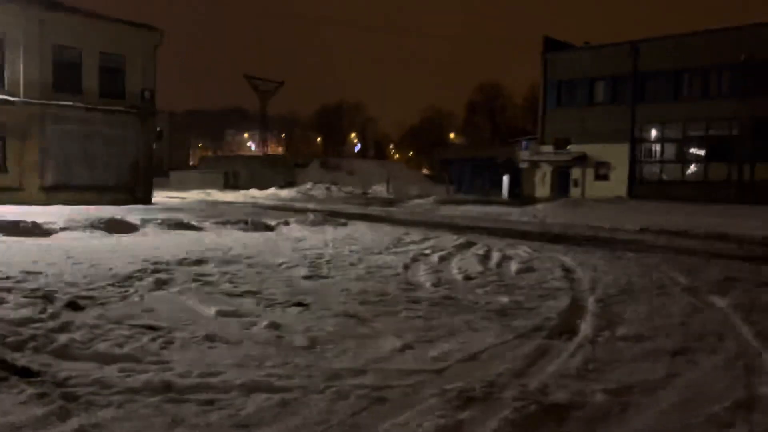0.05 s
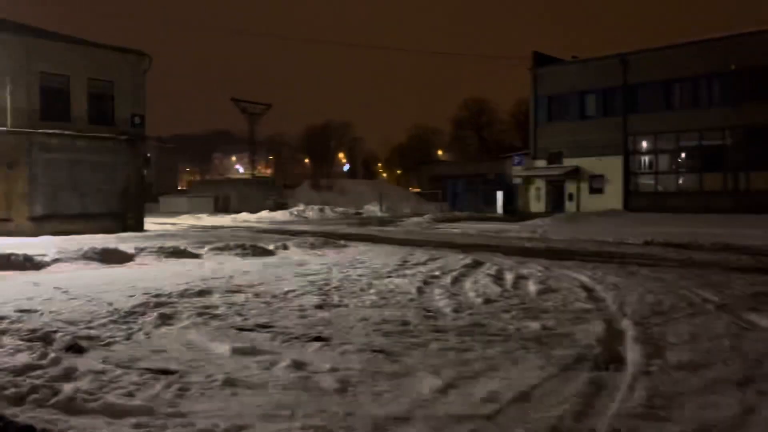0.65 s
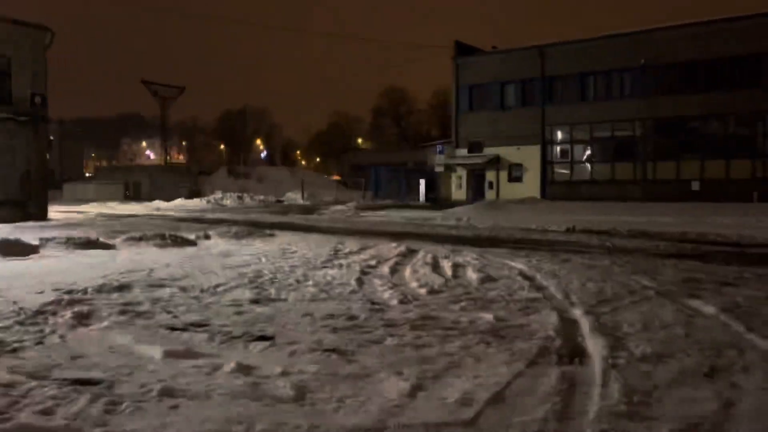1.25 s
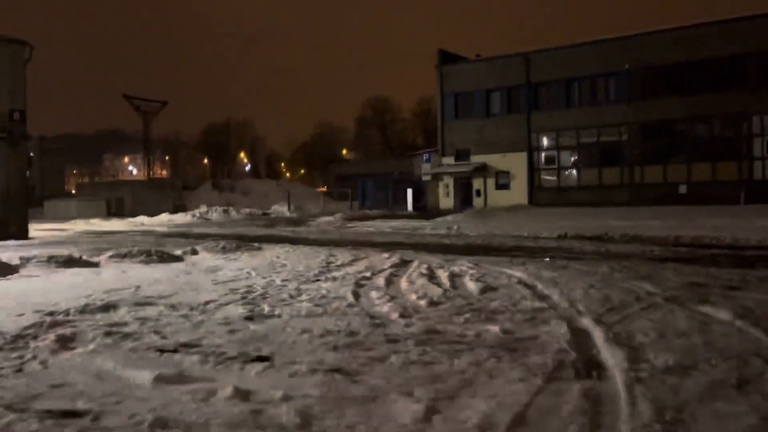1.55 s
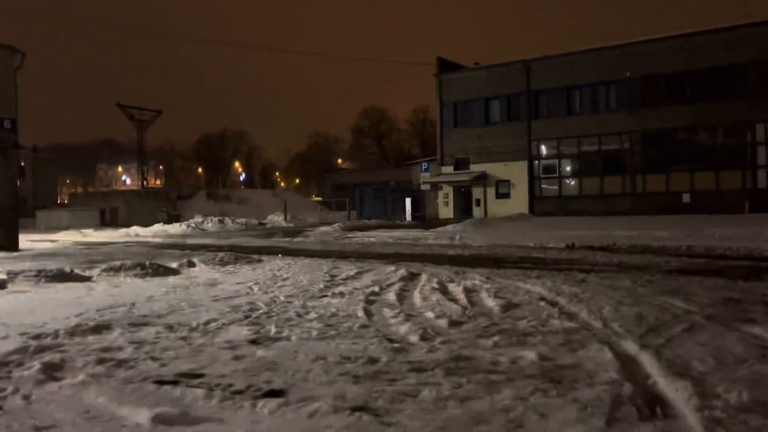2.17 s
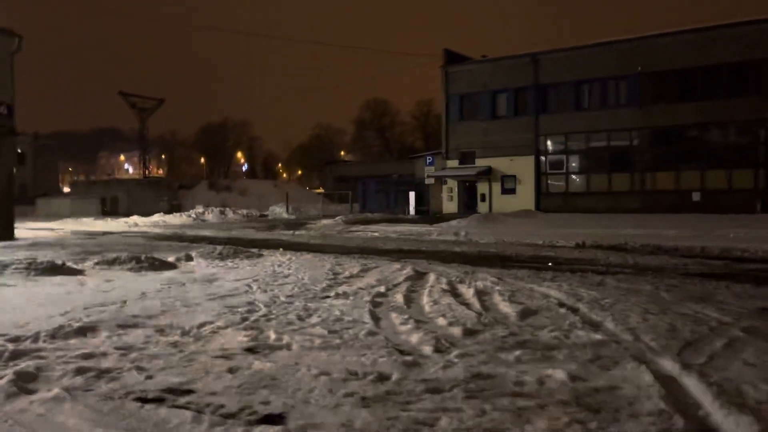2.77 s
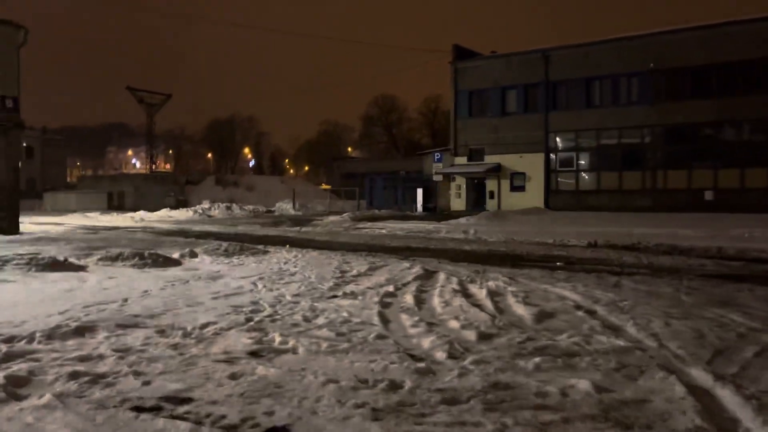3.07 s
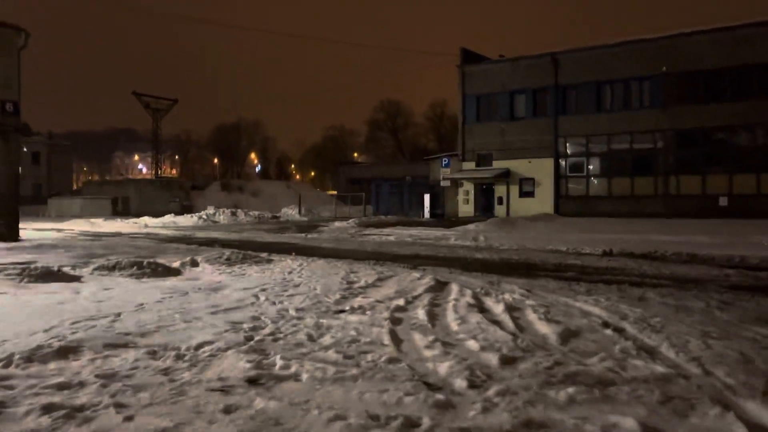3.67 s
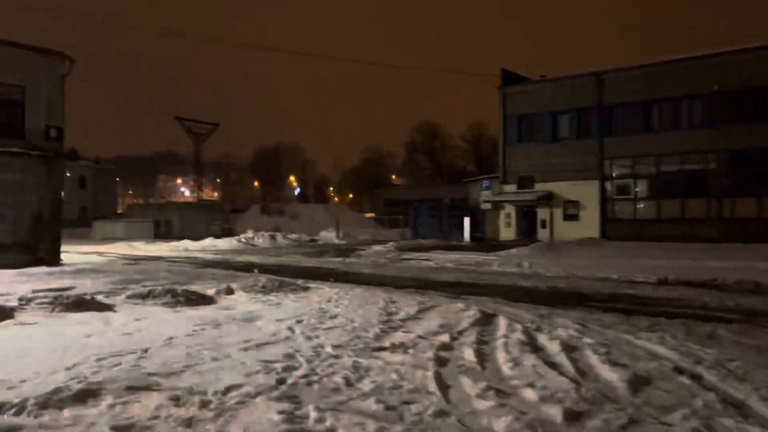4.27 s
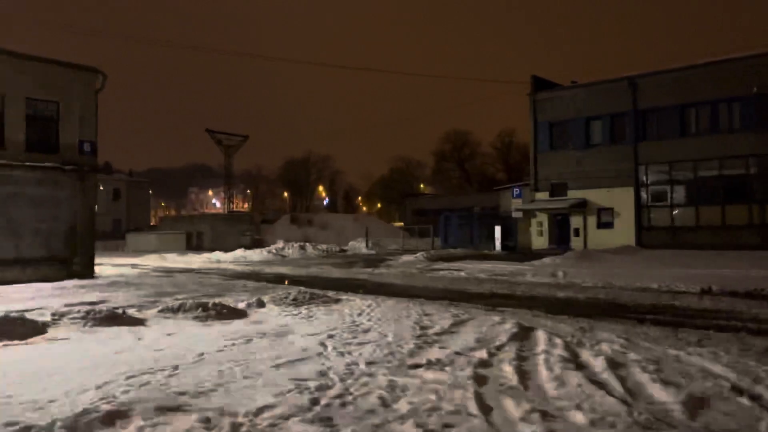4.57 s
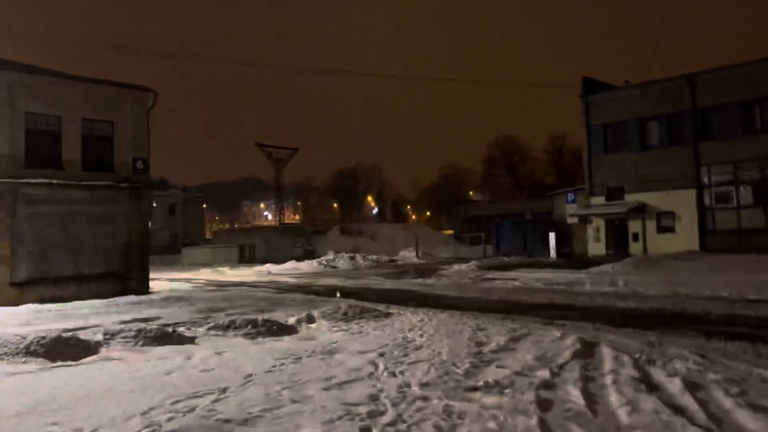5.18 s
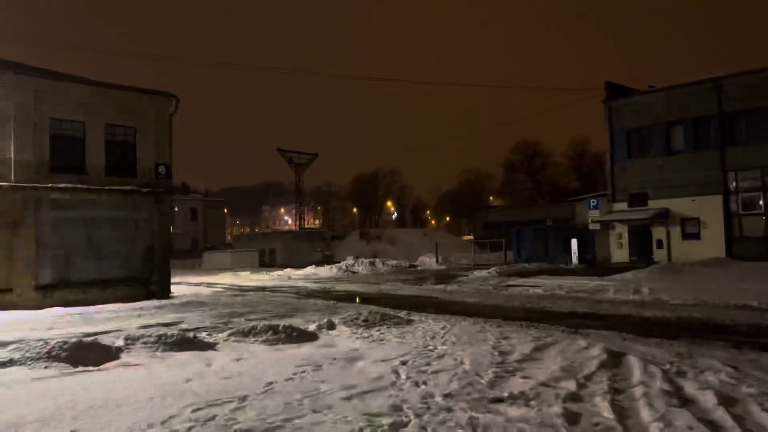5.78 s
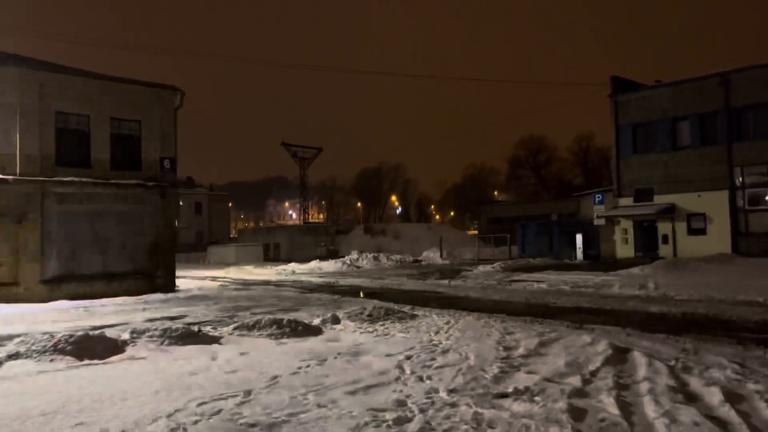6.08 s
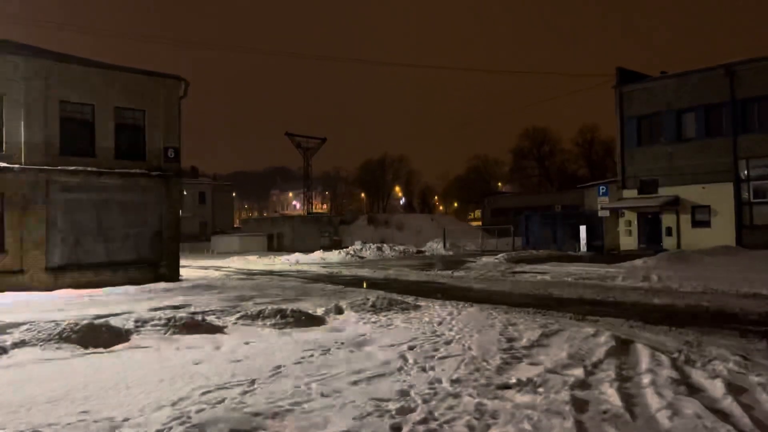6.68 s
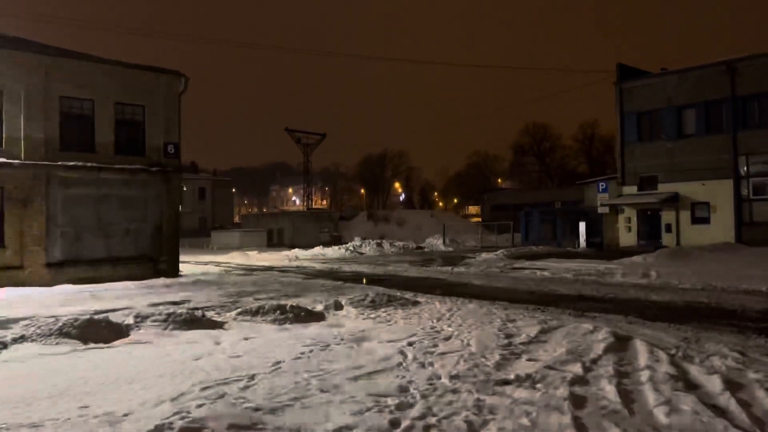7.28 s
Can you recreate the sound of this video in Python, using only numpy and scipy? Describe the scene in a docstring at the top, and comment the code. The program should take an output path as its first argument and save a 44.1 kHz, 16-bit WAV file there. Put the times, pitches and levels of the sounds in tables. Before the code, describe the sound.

Outdoors, someone walks at an even pace over frozen snow, each close step a gritty crunch with small snaps, scuffs and soft thumps. Short, low puffs of wind hit the handheld microphone early on, and clothing swishes lightly. The steps end after about five and a half seconds. What remains is quiet: a low town rumble, far traffic and a faint engine rising in pitch.

```python
"""An empty yard at night, on trodden, icy snow, heard from a phone in the hand of a walker who stops
after five and a half seconds. Close below, each sole crushes and scrapes the crust: collapsing grains
ring dully in the packed snow and fizz in the treble, with thuds, cracks and ticking crumbs of ice.
A jacket rustles beside the microphone and air buffets it now and then. Far off, traffic murmurs
and one engine slowly gathers speed."""
import sys
import numpy as np
from scipy import signal
from scipy.fft import rfft, irfft
from scipy.io import wavfile
from scipy.ndimage import uniform_filter1d

SR = 44100
rng = np.random.default_rng(int(sys.argv[2]) if len(sys.argv) > 2 else 0)


def dump_mix(stems):
    """Bounce the given channels to the path in sys.argv[1] as a 16-bit WAV at rate SR."""
    frames = np.atleast_2d(stems).T  # one column per channel
    limited = np.clip(frames, -1, 1)  # hard clip at full scale
    pcm = np.round(limited * 32767).astype(np.int16)
    wavfile.write(sys.argv[1], SR, pcm)


N = 332514
TIME = np.arange(N) / SR


def undb(db):
    """Decibels to gain."""
    return 10 ** (np.asarray(db) / 20)


def unit(x):
    """Scale to rms 1."""
    return x / np.sqrt(np.mean(x ** 2) + 1e-18)


def add(track, start_s, sound):
    """Mix a sound into a track."""
    i = max(int(start_s * SR), 0)
    track[i:i + len(sound)] += sound[:max(N - i, 0)]


def colour(x, spectrum, size=4096):
    """Causal filter shaped by (frequency_hz, relative_db) points; keeps the power of white noise."""
    hz, db = np.transpose(spectrum)
    gain = undb(np.interp(np.log(np.fft.rfftfreq(size, 1 / SR) + 1), np.log(hz), db))
    cepstrum = irfft(np.log(gain))
    cepstrum[1:size // 2] *= 2  # folding the cepstrum gives minimum phase
    cepstrum[size // 2 + 1:] = 0
    response = irfft(np.exp(rfft(cepstrum)))
    return signal.oaconvolve(x, response / np.linalg.norm(response))[:N]


def noise(spectrum):
    """Coloured noise, rms near 1."""
    return colour(rng.standard_normal(N), spectrum)


def drift(rate_hz):
    """Smooth random drift, spread near 1."""
    return np.interp(TIME * rate_hz, np.arange(N), rng.standard_normal(N))


# Far traffic, its murmur and its tyre hiss: frequency_hz, relative_db
MURMUR_SPECTRUM = [(60, 6.5), (120, 6.5), (250, -1.5), (400, 0), (1000, 0), (1500, -3.5), (2200, -12),
                   (4800, -30.5), (9000, -42), (10800, -74)]
TYRE_SPECTRUM = [(1200, 1.5), (2200, -2), (3300, 4), (4700, -5.5), (5800, -22), (10000, -40)]


def far_traffic(murmur_rise_db_per_s=0.6052, car_nears_s=4.9, hiss_rise_db_per_s=4.5):
    """A wide murmur of tyres grows slowly; their hiss rises faster once a car draws nearer."""
    murmur_db = -53 + murmur_rise_db_per_s * TIME
    hiss_db = -72.5 + hiss_rise_db_per_s * np.maximum(TIME - car_nears_s, 0)
    mid, side = (undb(murmur_db + 1.5 * drift(2.5)) * noise(MURMUR_SPECTRUM)
                 + undb(hiss_db) * noise(TYRE_SPECTRUM) for _ in range(2))
    return 0.86 * mid + np.array([[.45], [-.45]]) * side


# One engine across town, pitched at its firing rate: time_s, pitch_hz, level_db
ENGINE_REVS = [(0, 55.26, -52), (5.2, 59.8, -57), (5.601, 64.6, -56), (5.949, 72.06, -47),
               (6.301, 78.1, -46), (6.702, 79.8, -48.5), (7.051, 87.7, -53), (7.301, 94.7, -47.5),
               (7.54, 103, -45)]


def far_engine():
    """A lumpy engine pulls up through its revs; the way across town fades each order in and out."""
    times, *columns = np.transpose(ENGINE_REVS)
    firing_hz, level_db = (np.interp(TIME, times, column) for column in columns)
    phase = 2 * np.pi * np.cumsum(firing_hz) / SR
    engine = np.zeros(N)
    for order, order_db in [(1, 0), (3 / 4, -6), (3, -17)]:
        fading = .8 + drift(14) + 1j * drift(14)
        engine += undb(order_db) * np.real(fading * np.exp(1j * order * phase))
    return unit(engine) * undb(level_db)


# Rumble of the town beyond the yard: frequency_hz, relative_db
RUMBLE_SPECTRUM = [(20, -19), (36, -7.5), (52, 19), (70, 12), (110, -0.5), (250, -66)]
# Its rise and fall: time_s, level_db
RUMBLE_SWELLS = [(0, -53), (2.7, -47.5), (4.1, -60), (5.7, -45.5), (7.54, -56)]


def town_rumble():
    """The town's low rumble slowly swells and sinks."""
    level_db = np.interp(TIME, *np.transpose(RUMBLE_SWELLS))
    return undb(level_db) * noise(RUMBLE_SPECTRUM)


# Air striking the microphone: start_s, length_s, level_db
GUSTS = [(0, .16, -34.5), (0.428, 0.075, -36.5), (.588, 0.047, -38), (.948, 0.2, -27.5),
         (1.027, 0.063, -28.5), (1.169, 0.045, -19), (1.23, .2, -33.5), (1.658, 0.034, -39),
         (1.907, 0.27, -42), (2.293, 0.079, -33.5), (2.468, 0.08, -31.5), (2.692, 0.056, -39.5),
         (3.406, 0.03, -34), (3.644, 0.072, -39)]
# Its eddies, right at the ports: frequency_hz, relative_db
EDDY_SPECTRUM = [(22, -47), (45, -3.5), (68, 0), (110, -5.5), (200, -24.5), (400, -35), (900, -94)]


def wind_buffets(edge_s=0.034):
    """Eddies thump on the two microphone ports, partly on each alone."""
    force = np.zeros(N)
    for start, length, db in GUSTS:
        onset = np.tanh((TIME - start) * 2 / edge_s)
        ending = np.tanh((TIME - start - length) * 2 / edge_s)
        force += undb(db) * (onset - ending) / 2
    shared = noise(EDDY_SPECTRUM)
    eddies = np.array([shared + noise(EDDY_SPECTRUM) / 2 for _ in range(2)])
    running_rms = np.sqrt(uniform_filter1d(np.mean(eddies ** 2, axis=0), SR // 20))
    return force * eddies / running_rms


# A sleeve slides on the jacket, within arm's length: middle_s, half_width_s, level_db
SLEEVE_SWISHES = [(.035, 0.034, -51), (3.4, 0.22, -61), (5.76, .07, -54), (6.74, 0.21, -80)]
# The sliding cloth: frequency_hz, relative_db
SLEEVE_SPECTRUM = [(2500, -26), (4400, -12), (5300, 3), (6600, -4), (7400, 0), (8600, 4.5), (10200, 9),
                   (11500, -11), (12600, -20)]


def jacket(rustle_db=-63.5, rest_s=5.79, fade_db_per_s=42):
    """A jacket rustles faintly, bright as the ice, until the walker rests; at times a sleeve swishes."""
    moving_db = rustle_db - fade_db_per_s * np.maximum(TIME - rest_s, 0)
    rustle = undb(moving_db + 2.2 * drift(17)) * noise(ICE_SPECTRUM)
    sliding = sum(undb(db) * np.exp(-((TIME - middle) / width) ** 2)
                  for middle, width, db in SLEEVE_SWISHES)
    swish = sliding * noise(SLEEVE_SPECTRUM)
    return (rustle + swish) * undb(3.2 * drift(350))


def after_steps(db, spread_db, within_s=0.38, count=4):
    """A few small events at random moments after each heel strike: start_s, level_db."""
    heels = np.repeat([step[0] for step in FOOTFALLS], count)
    when, size = rng.random((len(heels), 2)).T
    return list(zip(heels + within_s * np.sqrt(when), db + spread_db * (2 * size - 1)))


# Kicked ice crumbs landing near the feet: start_s, relative_db
KICKED_CRUMBS = [(0.027, -23.5), (.1321, -31), (0.174, -30), (2.956, -39), (3.3636, -22), (3.4425, -28),
                 (3.493, -25), (3.9678, -33), (5.0584, -30), (5.664, -34.5), (5.893, -38.5),
                 (6.4668, -34.5)]


def ice_crumbs(ring_s=0.00092):
    """Bits of ice tick brightly on the frozen ground; every step also scatters finer ones."""
    ticks = np.zeros(N)
    t = np.arange(SR // 100) / SR
    for start, db in KICKED_CRUMBS + after_steps(db=-42.5, spread_db=-4):
        add(ticks, start, undb(db) * np.exp(-t / ring_s) * rng.standard_normal(len(t)))
    tick_spectrum = [(1500, -21), (5000, 0), (7000, -7.5), (8500, 8.5), (10500, 5), (12500, -9)]
    return undb(-5.5) * colour(ticks, tick_spectrum)


# Footfalls below the microphone; fizz (ice) and shake (ground) are relative to the crunch:
# start_s, bite_db, heel_s, heel_db, heel_swell_db, roll_db, sole_lag_s, sole_s, sole_db,
# settle_db, fizz_db, shake_db, grains_per_s
FOOTFALLS = [(.225, -50, 0.05, -31.5, -4.5, -48, .12, 0.044, -45, -53.5, -4, -8.5, 13400),
             (.762, -37.5, 0.078, -37, -1.5, -38.5, 0.16, 0.03, -30.5, -82, -3.5, -2.5, 3860),
             (1.291, -45, 0.053, -31.5, -8, -40.5, 0.13, 0.033, -27.5, -43.5, -2.5, -4.5, 5000),
             (1.92, -32.5, 0.053, -42, 10, -57, 0.065, 0.049, -36, -44.5, -5, -2.5, 1200),
             (2.474, -35.5, 0.021, -40.5, -5.5, -38, 0.038, 0.05, -33.5, -40, -6, -4, 1280),
             (3.021, -51, 0.14, -36.5, 9, -38, 0.18, 0.024, -32, -51, -3, -1.5, 9300),
             (3.64, -41, .043, -34, 1, -42, .136, .026, -31, -47.5, -5, -2.5, 1500),
             (4.235, -59, .13, -37, 4.5, -47, .189, 0.045, -38.5, -50, 0, -4, 8400),
             (4.78, -51, 0.08, -41, 13, -44.5, 0.14, 0.032, -36.5, -49.5, -3.5, -1.5, 4100),
             (5.375, -39, 0.014, -35, -8, -51, 0.049, 0.066, -34, -51.5, -8, -2, 3460)]
# A boot slips, pushes off or grazes the crust in mid swing: start_s, length_s, level_db, fizz_db
BOOT_SCUFFS = [(0.07, 0.023, -41, -3), (1.255, 0.025, -39, -14), (1.545, 0.0098, -27.5, -8.5),
               (1.793, 0.014, -36.5, -6), (1.826, 0.011, -41.5, -13), (3.122, 0.0283, -35.5, -13),
               (3.349, 0.029, -45.5, -13), (3.389, 0.006, -27.5, -15), (3.835, 0.0548, -40, -6.5),
               (4.092, .016, -37.5, -4.5), (4.135, 0.0071, -33.5, -4), (4.213, 0.0044, -30.5, -9.5),
               (4.70, 0.028, -41.5, -7), (5.054, 0.045, -42, -6), (5.523, .014, -39, -7)]


def boot_strokes(bite_s=0.003, bite_swell_db=-16, bite_grains_per_s=3000, settle_s=0.13):
    """The heel bites and digs in, the foot rolls, the sole lands, the snow settles; scuffs come too."""
    for (heel_at, bite_db, heel_s, heel_db, swell_db, roll_db, lag_s, sole_s, sole_db,
         settle_db, fizz_db, shake_db, rate) in FOOTFALLS:
        sole_at = heel_at + lag_s
        roll_s = max(lag_s - heel_s, .005)
        bright_db, muffled_db = fizz_db + 0.76, fizz_db - 2.5  # the heel scrapes, the flat sole muffles
        # start_s, length_s, level_db, fizz_db, shake_db, swell_db, grains_per_s
        yield heel_at, bite_s, bite_db, bright_db, shake_db, bite_swell_db, bite_grains_per_s
        yield heel_at, heel_s, heel_db, bright_db, shake_db - 0.5, swell_db, rate
        yield heel_at + heel_s, roll_s, roll_db, muffled_db, shake_db, -4, rate * 0.65
        yield sole_at, bite_s, sole_db - 7, muffled_db, shake_db, bite_swell_db, bite_grains_per_s
        yield sole_at, sole_s, sole_db, muffled_db, shake_db, 1.5, rate
        yield sole_at + sole_s, settle_s, settle_db, muffled_db, shake_db, -12, rate * .4
    for start, length, db, fizz_db in BOOT_SCUFFS:
        yield start, length, db, fizz_db, 0.5, 0, 1700


def sole_pressure(length_s, swell_db, grains_per_s, attack_s=0.0026, release_s=0.0035, slip_s=0.0059):
    """Pressure over one stroke: coarse crust gives way in jerks, fine snow slides evenly."""
    t = np.arange(int((length_s + 5 * release_s) * SR)) / SR
    pressure = undb(swell_db * np.minimum(t / length_s, 1)) * (1 - np.exp(-t / attack_s))
    pressure *= np.exp(-np.maximum(t - length_s, 0) / release_s)
    # every 7 to 20 ms the crust yields at once, then holds again
    slips = np.cumsum(np.append(0, rng.uniform(.007, .02, 50)))
    since_slip = t - slips[np.searchsorted(slips, t, side="right") - 1]
    jerk_db = 14 / np.sqrt(1 + (grains_per_s / 4000) ** 2)
    return pressure * undb(jerk_db * np.exp(-since_slip / slip_s))


def grains(pressure, length_s, grains_per_s, spread_db=3.5):
    """Unevenly sized grains collapse at random under the pressure; rms 1 over the stroke's length."""
    grain_rng = np.random.default_rng(rng.integers(2 ** 31))
    luck, size, sign = grain_rng.random((len(pressure), 3)).T
    breaks = luck <= max(grains_per_s / SR, np.sort(luck)[4])  # at least five grains
    size_db = spread_db * np.minimum(-np.log(1 - size), 3.5)
    impulses = breaks * undb(size_db) * np.sign(sign - .5) * pressure
    return unit(impulses) * np.sqrt(length_s * SR / len(pressure))


def shatter(impulses, decay_s):
    """Each impulse becomes a tiny burst of noise."""
    pole = np.exp(-1 / (decay_s * SR))
    power = signal.lfilter([1 - pole], [1, -pole], impulses ** 2 + 1e-18)
    return np.sqrt(power) * rng.standard_normal(N)


def crystal_patches(x, split_hz, spread_db, rate_hz, low_db=0):
    """Coarse and fine crystals take turns: the low and high bands flicker separately."""
    low = signal.sosfiltfilt(signal.butter(2, split_hz, fs=SR, output="sos"), x)
    low_flicker, high_flicker = (unit(undb(spread_db * drift(rate_hz))) for _ in range(2))
    return low * undb(low_db) * low_flicker + (x - low) * high_flicker


# Shaken ground, packed snow and icy surface, from hand height: frequency_hz, relative_db
GROUND_SPECTRUM = [(50, -16.5), (110, -5.5), (180, -2.5), (280, -3), (450, -25), (900, -50.5)]
SNOW_SPECTRUM = [(100, -30.5), (300, -3), (550, 0), (900, -1.5), (1400, -4), (1900, -11.5), (2600, -26.5),
                 (5000, -53)]
ICE_SPECTRUM = [(900, -3.5), (1800, -1.5), (2800, -1), (3800, -2.5), (5500, -7.5), (6300, -4.5),
                (7100, -9.5), (8100, -1.5), (9500, -4), (10400, 0), (11500, -7), (12400, -17.5),
                (13200, -20)]


def snow_crunch(fizz_steadiness=0.25, medium_grains_per_s=2260, crackle_db_per_octave=2.0):
    """Collapsing grains shake the ground, ring the packed snow and fizz at the icy surface."""
    ground, snow, ice = np.zeros((3, N))
    for start, length, db, fizz_db, shake_db, swell_db, rate in boot_strokes():
        pressure = sole_pressure(length, swell_db, rate)
        surface, deep = (grains(pressure, length, rate) for _ in range(2))
        add(ground, start, deep * undb(db + shake_db))
        add(snow, start, (surface + deep) / np.sqrt(2) * undb(db))
        progress = np.minimum(np.arange(len(pressure)) / (length * SR), 1)
        steadying_db = fizz_steadiness * swell_db * (1 - progress)  # fizz follows only part of the swell
        add(ice, start, surface * undb(db + fizz_db + steadying_db))
    # loosened powder keeps trickling for a moment after each collapse
    fizz = undb(1) * shatter(ice, decay_s=0.00097) + undb(-13) * shatter(ice, decay_s=0.012)
    settling = undb(-14.5) * shatter(snow, decay_s=0.0062)
    fizz = colour(fizz, ICE_SPECTRUM)
    ring = colour(undb(1.57) * snow + settling, SNOW_SPECTRUM)
    # coarse crust, with fewer grains a second, crackles lower than fine snow
    heels, *_, rates = np.transpose(FOOTFALLS)
    crackle_db = crackle_db_per_octave * np.interp(TIME, heels, np.log2(medium_grains_per_s / rates))
    fizz = crystal_patches(fizz, split_hz=4200, spread_db=0.37, rate_hz=99, low_db=crackle_db)
    ring = crystal_patches(ring, split_hz=1360, spread_db=2.9, rate_hz=90)
    return colour(ground, GROUND_SPECTRUM) + ring + fizz


# Dull blows of the heels and of the jolted phone: start_s, level_db, pitch_hz
SOFT_BLOWS = [(0.083, -28.5, 294), (.767, -22, 184), (.933, -20, 260), (1.033, -21.5, 161),
              (1.089, -19, 197), (1.183, -25, 178), (1.945, -25.5, 220), (2.501, -18, 176),
              (3.394, -21, 215), (3.67, -19.5, 157), (5.487, -30.5, 210), (6.469, -41, 300.2)]


def thuds(rise_s=.0032, sag_s=.005):
    """A soft blow gives a few low swings that sag through their listed pitch as the contact widens."""
    track = np.zeros(N)
    t = np.arange(SR // 20) / SR
    envelope = t / rise_s * np.exp(1 - t / rise_s)
    sag = .7 + .9 * np.exp(-t / sag_s)
    for start, db, hz in SOFT_BLOWS:
        phase = 2 * np.pi * np.cumsum(hz * sag) / SR
        add(track, start, undb(db) * envelope * np.sin(phase))
    return track


# Pieces of crust snapping underfoot: start_s, level_db, pitch_hz
CRUST_PIECES = [(0.485, -32, 1500), (0.5602, -29.5, 1360), (0.634, -35, 1500), (0.704, -33, 1460),
                (.931, -16, 800), (1.3662, -18.5, 1300), (1.8006, -19, 850), (2.077, -21, 900),
                (2.0844, -13.5, 945), (2.3489, -21.5, 755), (2.4778, -24, 1320), (2.487, -20.5, 1470),
                (2.556, -25, 770), (2.631, -24, 940), (3.123, -15, 790), (3.3916, -15.5, 600),
                (3.7039, -16, 1410), (3.783, -17.5, 760), (3.7955, -11.5, 920), (3.833, -23.5, 820),
                (3.8656, -8, 870), (3.8706, -14.5, 890), (3.88, -11.5, 856), (3.9125, -23, 1100),
                (4.0905, -20, 820), (4.1052, -15.5, 835), (4.1389, -22, 745), (5.0766, -19.5, 754),
                (5.2128, -28.5, 940), (5.3731, -14.5, 930), (6.4697, -34, 510)]


def crust_cracks(rise_cycles=0.7, snap_db=-18, snap_s=0.00053, small_piece_hz=1260):
    """A sharp snap, then two or three heavily damped swings of the crust; small pieces die sooner."""
    knocks, snaps = np.zeros((2, N))
    t = np.arange(SR // 100) / SR
    # small pieces go on snapping while a foot bears weight
    small_pieces = [(start, db, small_piece_hz * 2 ** rng.uniform(-0.56, 0.43))
                    for start, db in after_steps(db=-43.5, spread_db=2.5)]
    for start, db, hz in CRUST_PIECES + small_pieces:
        age = t * hz / rise_cycles
        envelope = (age * np.exp(1 - age)) ** 2
        add(knocks, start, undb(db) * envelope * np.sin(2 * np.pi * hz * t))
        add(snaps, start, undb(db + snap_db) * np.exp(-t / snap_s) * rng.standard_normal(len(t)))
    return knocks + colour(snaps, ICE_SPECTRUM)


# The two microphone ports, for sound from below:
# frequency_hz, left_minus_right_db, left_lead_rad, coherence
PORT_RESPONSE = [(333, -0.5, 0.28, 0.86), (676, -1, 0.33, 1), (1300, -3, 0.1, 0.84), (1960, -5, 0.99, 1),
                 (2680, 7.5, 2, 0.58), (3500, 7.5, 0.46, 0.72), (5830, 5, 1.61, 0.89),
                 (6500, -2.5, 1, 0.55), (7500, 1.5, 1, 0.42), (9240, -1.5, -1.62, 1),
                 (10540, 1.5, -3.5, 0.96), (11500, -0.5, -5.5, 0.54)]


def microphone_ports(x, paths=3, path_taps=40):
    """Hand and phone shade and delay each port differently; some sound scatters by changing paths."""
    hz, *columns = np.transpose(PORT_RESPONSE)
    bins_hz = np.fft.rfftfreq(N, 1 / SR)
    balance_db, lead, coherence = (np.interp(bins_hz, hz, column) for column in columns)
    scattered = np.zeros(N)
    for _ in range(paths):
        strength = drift(70)
        echoes = unit(rng.standard_normal(path_taps))
        scattered += strength * np.convolve(x, echoes)[:N]
    scattered *= np.std(x) / np.std(scattered)
    side = np.array([[1], [-1]])
    shade = undb(side * balance_db / 2)
    shade /= np.sqrt(np.mean(shade ** 2, axis=0))
    direct = rfft(x) * np.sqrt((1 + coherence) / 2)
    diffuse = side * rfft(scattered) * np.sqrt((1 - coherence) / 2)
    left_lead = np.exp(1j * lead * np.array([[1], [0]]))
    return irfft((direct + diffuse) * shade * left_lead, N)


def scene():
    """The walker close by, air on the microphone and the town far off all round."""
    walker = snow_crunch() + thuds() + crust_cracks() + ice_crumbs() + jacket()
    return microphone_ports(walker) + wind_buffets() + far_traffic() + far_engine() + town_rumble()


def record(dry):
    """The phone cuts the top treble steeply."""
    top_hz = 12700
    return signal.sosfilt(signal.ellip(8, .2, 70, top_hz, fs=SR, output="sos"), dry)


dry = scene()
out = record(dry)
dump_mix(out)
```